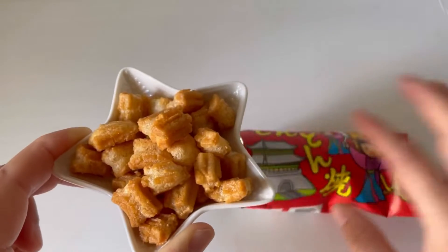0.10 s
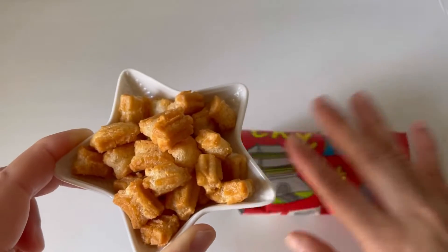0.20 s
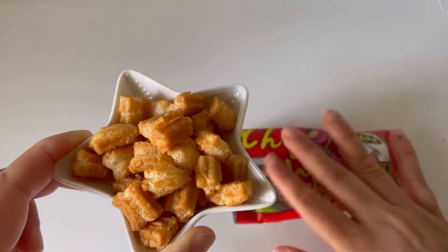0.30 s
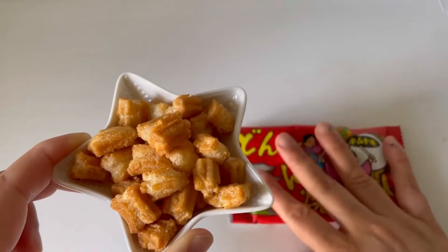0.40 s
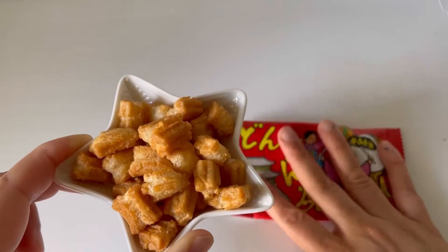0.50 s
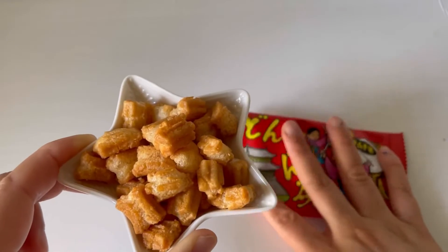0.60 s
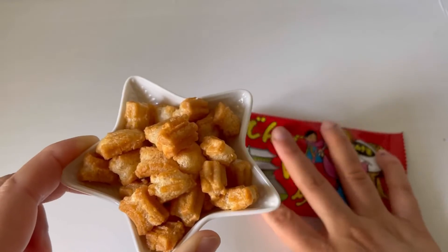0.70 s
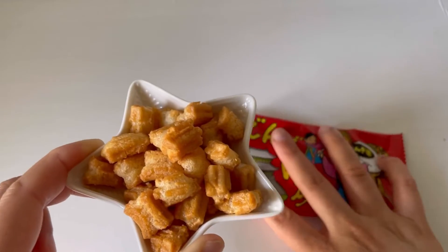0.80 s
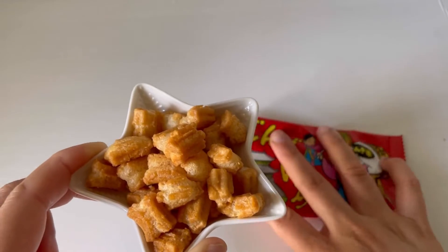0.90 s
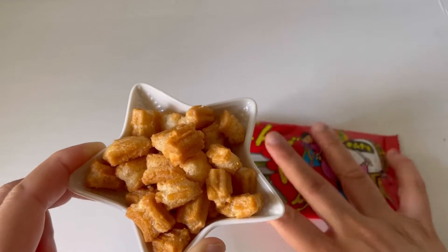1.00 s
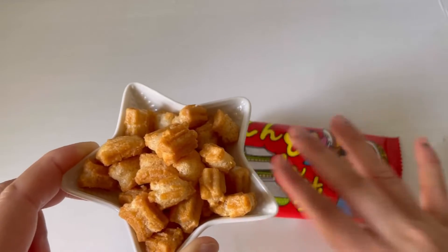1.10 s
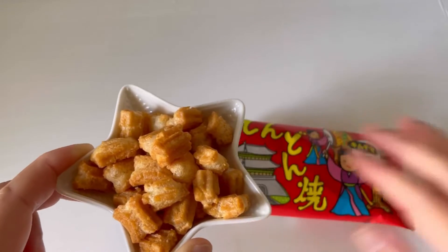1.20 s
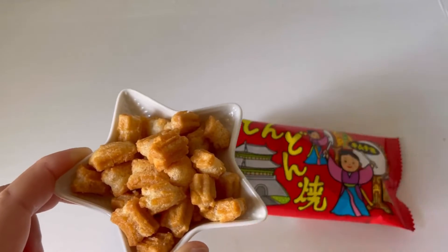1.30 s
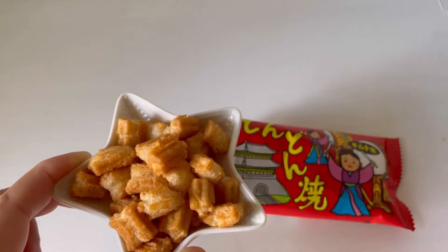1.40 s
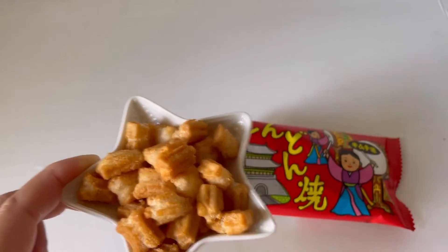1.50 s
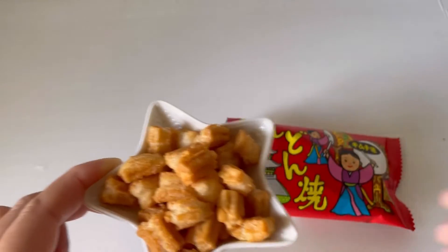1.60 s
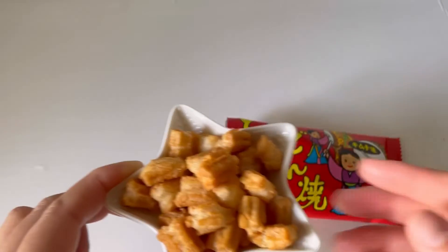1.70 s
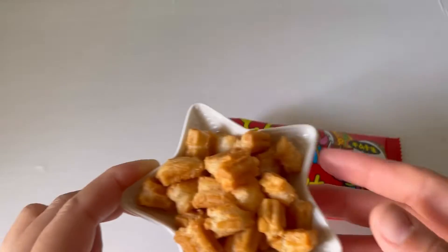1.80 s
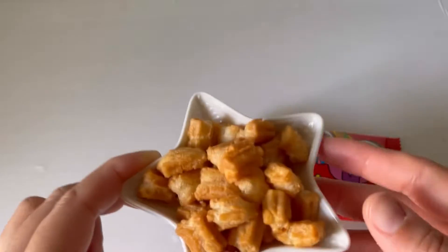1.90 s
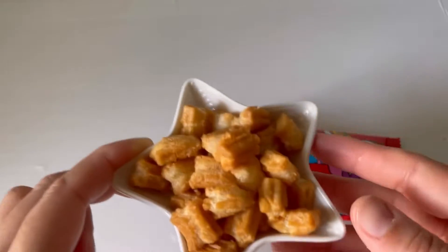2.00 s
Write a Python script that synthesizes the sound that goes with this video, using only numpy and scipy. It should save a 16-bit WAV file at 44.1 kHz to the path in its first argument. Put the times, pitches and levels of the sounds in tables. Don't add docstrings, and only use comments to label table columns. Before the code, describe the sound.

A small stiff plastic snack bag crinkles under a hand: faint ticks, a dense burst of sharp crackles when pressed, lighter rubbing snaps, then scattered pops as it springs back. Close stereo microphones, quiet small room.

```python
import sys
import numpy as np
from scipy import signal
from scipy.fft import rfft, irfft
from scipy.io import wavfile

SR = 44100
rng = np.random.default_rng(int(sys.argv[2]) if len(sys.argv) > 2 else 0)


def dump(signal):
    limited = np.clip(np.atleast_2d(signal).T, -1, 1)
    pcm = np.round(limited * 32767).astype(np.int16)
    wavfile.write(sys.argv[1], SR, pcm)


def gain_from_decibels(decibels):
    exponent = np.asarray(decibels, float) / 20
    return 10 ** exponent


N = 88200

SNAP_LEAD_S = 0.0008


def in_time(rows):
    return np.interp(np.arange(N) / SR, *np.transpose(rows))


def at_hz(points, hz):
    f, v = np.transpose(points)
    return np.interp(np.log(hz + 1), np.log(f + 1), v)


def rms_one(x):
    return x / np.sqrt(np.mean(x ** 2) + 1e-20)


def peak_one(x):
    return x / np.abs(x).max()


def colour(x, spectrum):
    hz = np.fft.rfftfreq(x.shape[-1], 1 / SR)
    below = np.minimum(1, hz / spectrum[0][0]) ** 2
    return irfft(rfft(x) * gain_from_decibels(at_hz(spectrum, hz)) * below, x.shape[-1])


def ring(x, hz, t60):
    radius = gain_from_decibels(-60 / (t60 * SR))
    w = 2 * np.pi * hz / SR
    return signal.lfilter([0, np.sin(w)], [1, -2 * radius * np.cos(w), radius * radius], x)


def burst(x, rise_s, fall_s):
    t = np.arange(len(x)) / SR
    return x * (1 - np.exp(-t / rise_s)) ** 2 * np.exp(-t / fall_s)


def snaps():
    # start_s, ring_pitch_hz, ring_db, crack_db, tick_db
    settle = [(0.005, 1329, -38, -62.5, -44), (0.0377, 760.0, -34, -68, -40),
              (0.0442, 803, -42.5, -68.5, -62), (0.0527, 2076, -42, -54.5, -43.5),
              (0.0596, 797, -39.5, -56, -49), (0.0645, 2210.0, -44, -65, -68),
              (0.0869, 1557, -37.5, -58, -48), (0.1819, 1340, -41, -61.5, -51.5)]
    press = [(0.2006, 1657, -20, -40.5, -51.5), (0.209, 1527, -31, -39.5, -35.5),
             (0.2296, 1724, -28, -44.5, -41), (0.233, 1420.0, -27, -43, -41),
             (0.239, 1417, -23.5, -43, -51.5), (0.247, 1284, -24.5, -52.5, -55.5),
             (0.2511, 1144, -23.5, -42.5, -61), (0.256, 1240.0, -22, -35.5, -54.5),
             (0.2671, 1430.0, -24, -40.5, -56), (0.273, 1510, -23.5, -27, -49.5),
             (0.2804, 1276, -15.5, -34.5, -56), (0.2902, 1417, -7.5, -18.5, -29),
             (0.314, 1780, -23.5, -31, -25.5), (0.3378, 1033, -15.5, -21.5, -20),
             (0.3502, 1640.0, -27, -26.5, -43), (0.3541, 3496, -16, -28.5, -25.5),
             (0.3677, 1744, -13.5, -22, -29), (0.3764, 2214, -25, -33.5, -40), (0.386, 1816, -21, -24, -33),
             (0.3913, 1780, -23, -26.5, -21), (0.4077, 1727, -21, -33, -42)]
    rub = [(0.4511, 1380.0, -34.5, -55.5, -58), (0.476, 2160.0, -24, -33, -54),
           (0.4897, 1800.0, -18, -30, -37), (0.5, 870.0, -20, -24, -24), (0.5146, 840.0, -30.5, -27, -35),
           (0.5283, 1750.0, -19, -19.5, -29), (0.5353, 1780.0, -28.5, -30.5, -38.5),
           (0.554, 3180.0, -34.5, -22, -29), (0.562, 3200.0, -35, -28, -41),
           (0.5888, 3260.0, -27, -31.5, -21), (0.5932, 1860.0, -23.5, -27, -28.5),
           (0.622, 1490.0, -26.5, -36, -58.5), (0.632, 3270.0, -34.5, -27.5, -47),
           (0.6455, 1400.0, -21.5, -25.5, -18.5), (0.6552, 3250.0, -28.5, -25.5, -23.5),
           (0.6621, 3270.0, -22.5, -33, -32), (0.684, 2720.0, -23.5, -25, -39),
           (0.717, 1780.0, -33, -47, -54), (0.729, 2120.0, -30.5, -35.5, -30.5),
           (0.7343, 3310.0, -30, -37, -39.5), (0.7817, 1840.0, -24, -28, -44.5)]
    lift = [(0.8362, 1030, -41.5, -56, -68), (0.87, 2040, -35.5, -45, -79),
            (0.8781, 2255, -27.5, -28.5, -28), (0.8825, 3140, -52, -33, -26.5),
            (0.8968, 1550, -35, -54, -66), (0.914, 1900, -36, -31, -36), (0.9266, 3300, -27, -35, -24.5),
            (0.9347, 3290, -30, -27, -31.5), (0.9503, 1650, -19, -21.5, -26), (0.96, 1920, -24, -25, -33),
            (0.9785, 2000, -25, -37, -59), (0.9947, 980, -42, -30.5, -47), (1.0099, 1510, -21, -30, -24.5),
            (1.0171, 1780, -39, -41, -56), (1.0468, 1430, -33.5, -49.5, -50.5),
            (1.071, 2227, -19.5, -25.5, -49), (1.1433, 1140, -43.5, -68, -71)]
    spring_back = [(1.2132, 1504, -21, -26, -26), (1.2241, 1430, -25.5, -29, -46),
                   (1.2622, 1406, -19.5, -26.5, -34.5), (1.3123, 1030, -39.5, -52, -52),
                   (1.3733, 1496, -20, -24.5, -27), (1.4579, 1307, -22.5, -35, -56),
                   (1.4659, 874, -27.5, -56, -63)]
    # start_s, ring_pitch_hz, ring_db, crack_db, tick_db
    small = [(0.1937, 1630, -41, -49, -61), (0.225, 1790, -35, -53, -46), (.2975, 1610, -28, -33, -50),
             (0.4967, 2200, -33, -25.5, -43), (.498, 1700, -24, -33, -31), (.505, 754, -31.5, -40, -46),
             (.5112, 766, -32.5, -37, -48), (0.5226, 1500, -36, -31, -47), (1.161, 1980, -59, -52.5, -53.5),
             (1.205, 1740, -64, -55, -76), (1.219, 1280, -27.5, -38, -50.5), (1.367, 1300, -49, -50.5, -61),
             (1.393, 3770, -45, -47.5, -56.5), (1.44, 1750, -48, -65, -70),
             (0.147, 1700, -52.5, -60, -57.5), (0.26, 1500, -29, -40, -53), (0.4592, 1500, -39, -48.5, -60),
             (.58, 1800, -32.5, -39, -47.5), (.761, 1220, -42, -47, -65)]
    # pitch_hz, level_db
    bag_modes = [(820, -6.5), (1100, -5.5), (1430, 6), (1780, 16.5), (2220, 14.5), (2750, -0.5),
                 (3300, -5.5)]
    # pitch_hz, level_db_per_hz
    crack_colour = [(2500, -3.5), (4000, -0.5), (4800, -9.5), (5600, -2), (8500, -10.5), (12000, -27)]
    # pitch_hz, level_db_per_hz
    tick_colour = [(9000, 2), (11000, 8.5), (13500, 0), (17000, -33)]
    crack_rise_s, crack_fall_s, tick_fall_s = 0.00042, 0.0032, 0.0014
    bag_t60_s, push_hz, push_t60_s = 0.0092, 450, 0.011

    rows = np.vstack([settle, press, rub, lift, spring_back, small])
    size = 2048
    noise = rng.standard_normal((len(rows), 2, size))
    mode_chance_db = rng.normal(0, 5, (len(rows), len(bag_modes)))
    out = np.zeros(N + size)
    for (s, hz, ring_db, crack_db, tick_db), (low, high), chance in zip(rows, noise, mode_chance_db):
        slips = burst(low, rise_s=0.00025, fall_s=0.0016)
        bag_air = sum(gain_from_decibels(mode_db + c) * ring(slips, mode_hz, bag_t60_s)
                      for (mode_hz, mode_db), c in zip(bag_modes, chance))
        rough = peak_one(ring(slips, hz, 8 / hz))
        body = facet(hz, low[0], size) + gain_from_decibels(-8.5) * rough + gain_from_decibels(-3) * peak_one(bag_air)
        band = signal.butter(2, [0.43 * hz, 3300], "band", fs=SR, output="sos")
        body = peak_one(signal.sosfilt(band, body))

        shove = ring(np.abs(slips), push_hz, push_t60_s)
        push = gain_from_decibels(-24) * peak_one(ring(shove, push_hz, push_t60_s))

        crack = peak_one(colour(burst(high, crack_rise_s, crack_fall_s), crack_colour))
        tick = peak_one(colour(burst(high, crack_rise_s, tick_fall_s), tick_colour))
        i = int((s - SNAP_LEAD_S) * SR)
        out[i:i + size] += gain_from_decibels(ring_db) * (body + push) + gain_from_decibels(crack_db + 1) * crack + gain_from_decibels(tick_db + 7) * tick
    return out[:N]


def facet(hz, phase, size):
    swing = np.sin(2 * np.pi * (hz * np.arange(size) / SR + phase))
    return peak_one(burst(swing, rise_s=0.0004, fall_s=0.00082 + 1.26 / hz))


def neighbours():
    # start_s, pitch_hz, level_db
    facets = [(0.1999, 993, -22.5), (.2903, 522, -25), (.314, 3640, -27), (0.315, 2830, -25.5),
              (.3372, 3560, -21.5), (0.3368, 5570, -26), (0.3672, 839, -21.5), (0.3917, 2200, -24.5),
              (0.3902, 3060, -22.5), (.5, 2217, -20.5), (.5, 1780, -20.5), (0.5885, 1970, -28.5),
              (.7817, 910, -34.5), (0.8775, 5520, -32.5), (1.0099, 1804, -21), (1.0712, 1470, -22.5),
              (1.2128, 5490, -26.5), (1.2132, 1090, -32.5), (1.2148, 3820, -37), (1.2614, 2500, -22.5),
              (1.374, 1115, -23.5), (1.3739, 2220, -29.5), (1.3735, 5640, -30.5), (1.4582, 910, -32.5),
              (1.4649, 1610, -29.5), (1.0708, 480, -40), (.6841, 890, -33), (.4897, 970, -27.5),
              (1.2132, 450, -40), (.6218, 2300, -31), (.9506, 3220, -31)]
    size = 1024
    out = np.zeros(N)
    for (s, hz, db), phase in zip(facets, rng.random(len(facets))):
        i = int((s - SNAP_LEAD_S) * SR)
        out[i:i + size] += gain_from_decibels(db) * facet(hz, phase, size)
    return out


def rustle():
    # time_s, level_db
    strain = [(0, -46.5), (.09, -56.5), (.12, -65.5), (.175, -73), (.2, -49), (.26, -46), (.4, -34.5),
              (.44, -53.5), (.52, -45), (.7, -48), (.83, -58), (1.0, -45), (1.18, -62.5), (1.48, -55),
              (1.65, -81)]
    # pitch_hz, level_db_per_hz
    crease_colour = [(130, 3), (330, 0.5), (600, -1.5), (1800, -2.5), (4300, -8.5), (9000, -18.5),
                     (13200, -15.5), (14200, -40), (16000, -53)]
    grains_per_s, grain_spread_db = 2500, 4
    sizes = gain_from_decibels(grain_spread_db * np.minimum(rng.exponential(1, N), 4)) * rng.choice([-1, 1], N)
    grains = sizes * (rng.random(N) < grains_per_s / SR)
    puff = np.exp(-np.arange(132) / 30)
    creases = np.convolve(np.abs(grains), puff)[:N] * rng.standard_normal(N)
    return gain_from_decibels(in_time(strain)) * rms_one(colour(creases, crease_colour))


def table():
    # peak_s, level_db, swell_s
    hums = [
        (0.44, -47.5, 0.025),
        (0.545, -39, 0.023),
        (.705, -46, 0.022),
        (0.004, -46, 0.017),
    ]
    t = np.arange(N) / SR
    swells = sum(gain_from_decibels(db) * np.exp(-.5 * ((t - s) / swell) ** 2) for s, db, swell in hums)
    return np.sin(2 * np.pi * 135 * t) * swells


def ports(x):
    # pitch_hz, gap_db
    port_tilt = [(300, 1.2), (1200, .3), (3400, -1.4), (6000, .1), (12000, .3)]
    # pitch_hz, lead_radians
    port_lead = [(0, 0), (2400, .35), (4500, .75), (5600, .4), (8600, 2.5), (10000, 3.14), (11300, 3.6),
                 (12500, 4.25), (13900, 5.3)]
    hz = np.fft.rfftfreq(N, 1 / SR)
    way = np.array([[.5], [-.5]])
    gain = gain_from_decibels(at_hz(port_tilt, hz) * way)
    turn = np.exp(1j * at_hz(port_lead, hz) * way)
    return irfft(rfft(x) * gain * turn, N)


def stray(x):
    # pitch_hz, level_db
    stray_colour = [(450, -6), (1300, -22), (3400, 0), (6000, 0), (10000, -3), (15000, -4)]
    step, length = 882, 220
    out = np.zeros((2, N + length))
    paths = rng.standard_normal((N // step, 2, length)) * np.exp(-np.arange(length) / 60)
    for k, pair in enumerate(paths):
        i = k * step
        out[:, i:i + step + length - 1] += signal.fftconvolve(x[None, i:i + step], pair, axes=1)
    return gain_from_decibels(-7) * colour(out[:, :N], stray_colour) / np.sqrt(30)


def diffuse(pair):
    # pitch_hz, correlation
    likeness = [(60, 1), (100, .995), (150, .96), (290, .6), (640, .05), (1400, .85), (3100, .45),
                (7000, .1), (10000, -.9), (13000, .4)]
    alike = np.clip(at_hz(likeness, np.fft.rfftfreq(N, 1 / SR)), -1, 1)
    mid, side = rfft(pair)
    mixed = np.sqrt(1 + alike) * mid + np.sqrt(1 - alike) * side * [[1], [-1]]
    return irfft(mixed / np.sqrt(2), N)


def room(x):
    t60_s, wall_cut_hz = 0.21, 10450
    t = np.arange(SR // 2) / SR
    tail = rng.standard_normal((3, len(t))) * gain_from_decibels(-60 * t / t60_s) * (t > .002)
    tail = signal.sosfilt(signal.butter(2, wall_cut_hz, fs=SR, output="sos"), tail)
    tail = rms_one(tail) / np.sqrt(len(t))
    wet = gain_from_decibels(-18) * signal.fftconvolve(x[None], tail, axes=1)[:, :N]
    return ports(wet[0]) + gain_from_decibels(-1) * diffuse(wet[1:])


def floor():
    # pitch_hz, level_db_per_hz
    rumble_colour = [(50, 4), (140, -9.5), (190, -13.5), (650, -23), (2300, -30.5), (8000, -55),
                     (10500, -72.5), (12500, -55), (14500, -89)]
    mains_hz = 48.75
    t = np.arange(N) / SR
    hum = gain_from_decibels(-54.5) * np.sin(2 * np.pi * mains_hz * t)
    hum = hum + gain_from_decibels(-58.5) * np.sin(4 * np.pi * mains_hz * t)
    rumble = rms_one(colour(rng.standard_normal((2, N)), rumble_colour))
    return gain_from_decibels(-54.5) * diffuse(rumble) + hum


def scene():
    bag = snaps() + neighbours() + rustle()
    return ports(bag) + stray(bag) + room(bag) + table() + floor()


def low_pass(x):
    return signal.sosfilt(signal.butter(12, 16810, fs=SR, output="sos"), x)


def record(dry):
    rumble_cut = signal.butter(4, 45.6, "high", fs=SR, output="sos")
    treble_cut = signal.cheby2(12, 70, 17200, fs=SR, output="sos")
    mix = signal.sosfilt(treble_cut, signal.sosfilt(rumble_cut, dry))
    return low_pass(mix)


dry = scene()
out = record(dry)
dump(out)
```